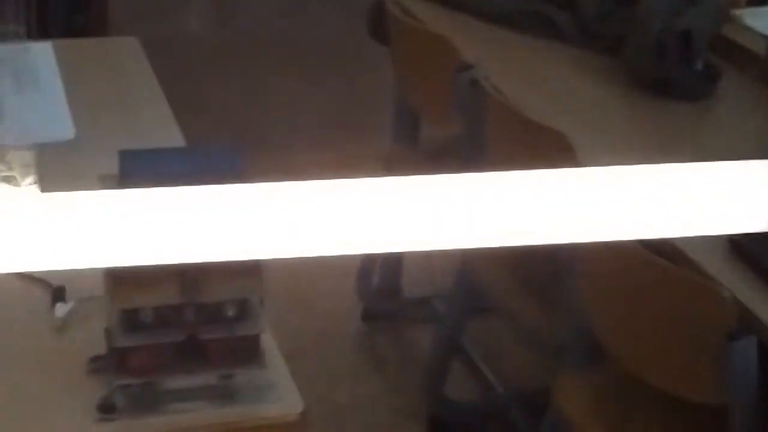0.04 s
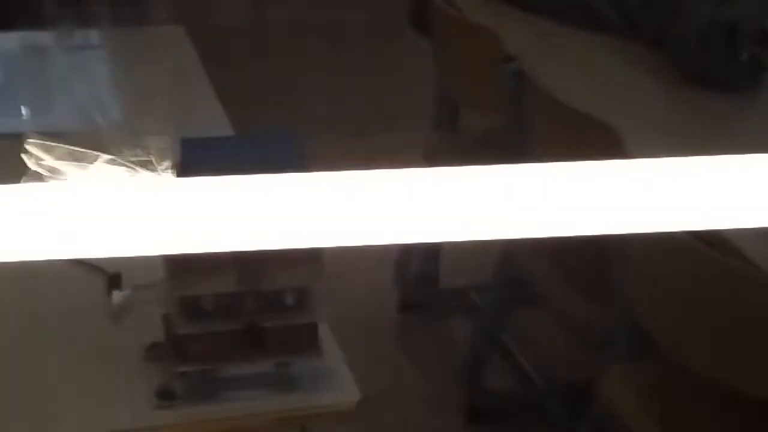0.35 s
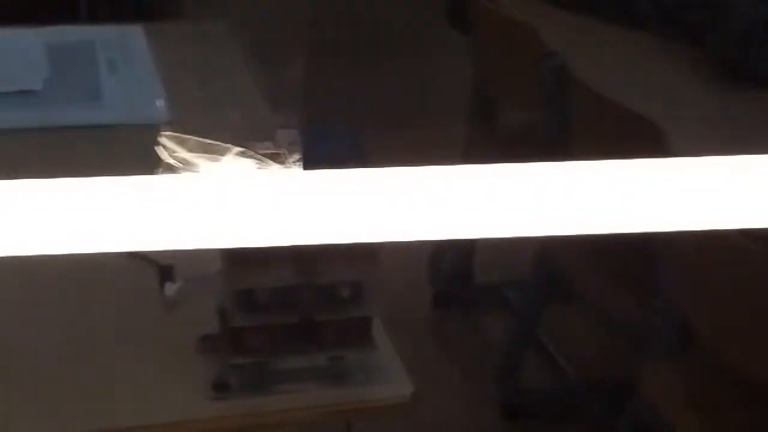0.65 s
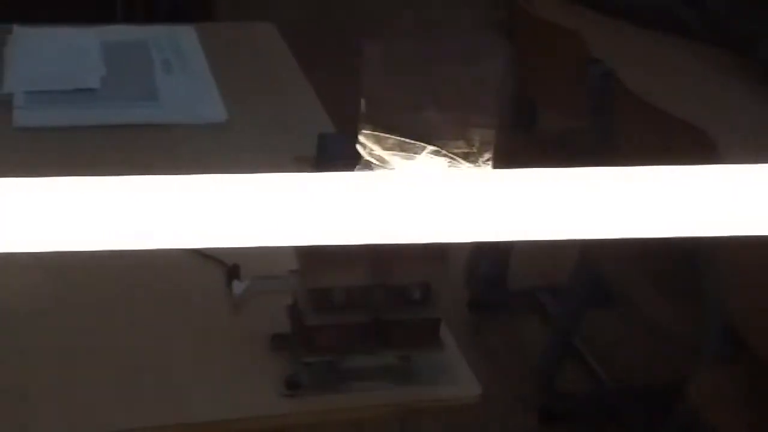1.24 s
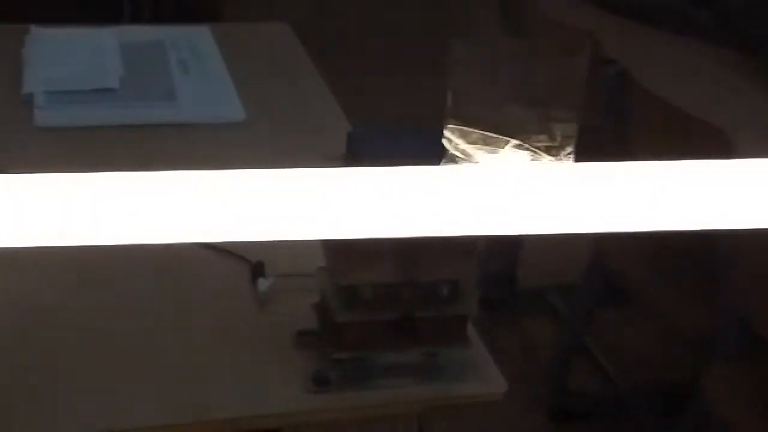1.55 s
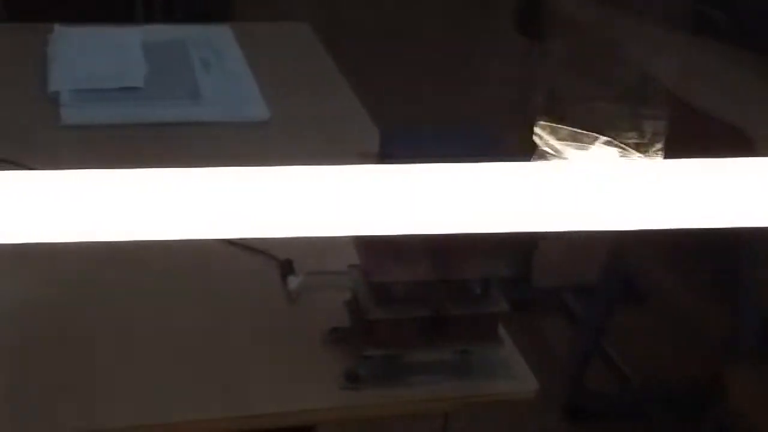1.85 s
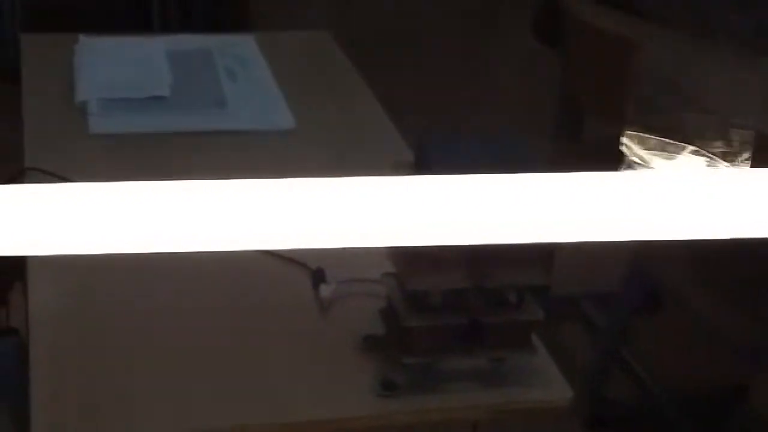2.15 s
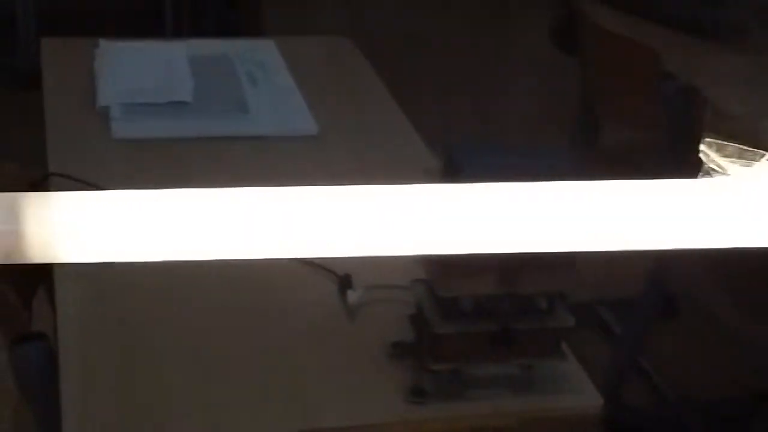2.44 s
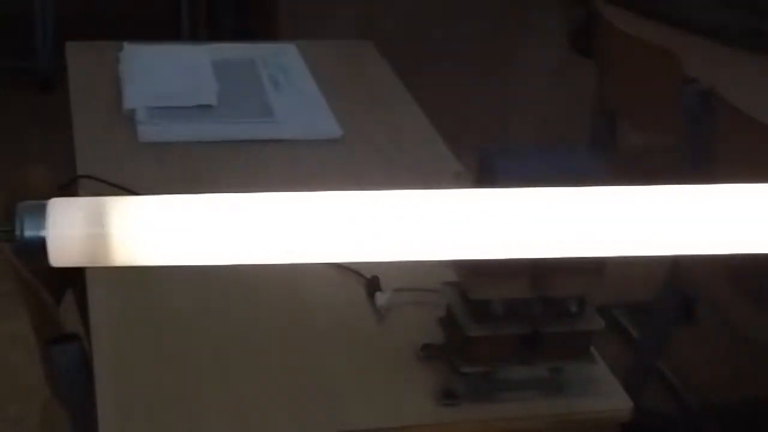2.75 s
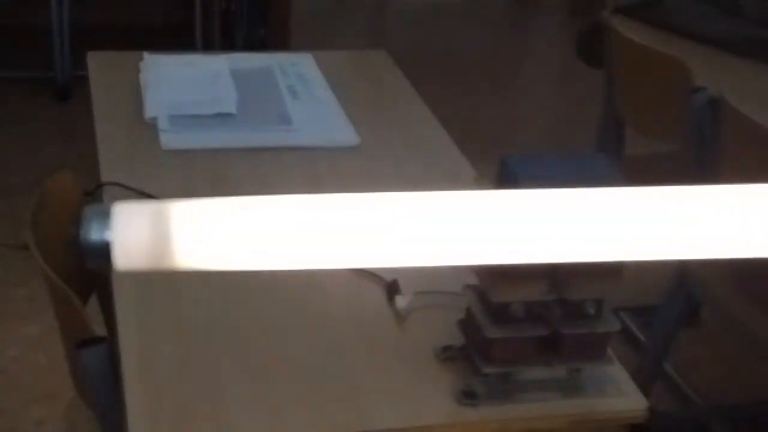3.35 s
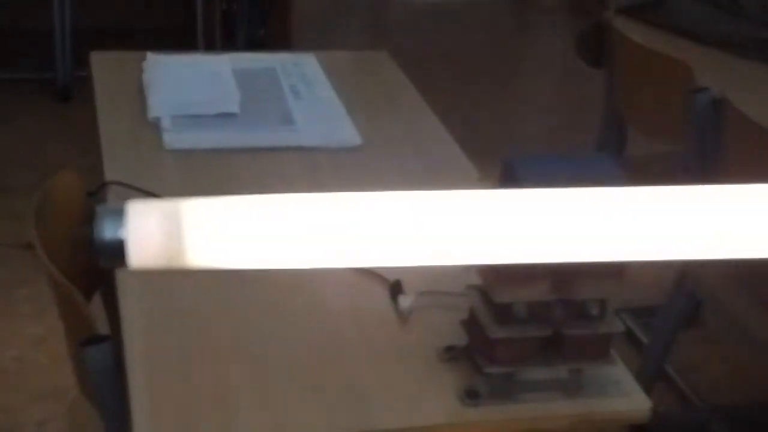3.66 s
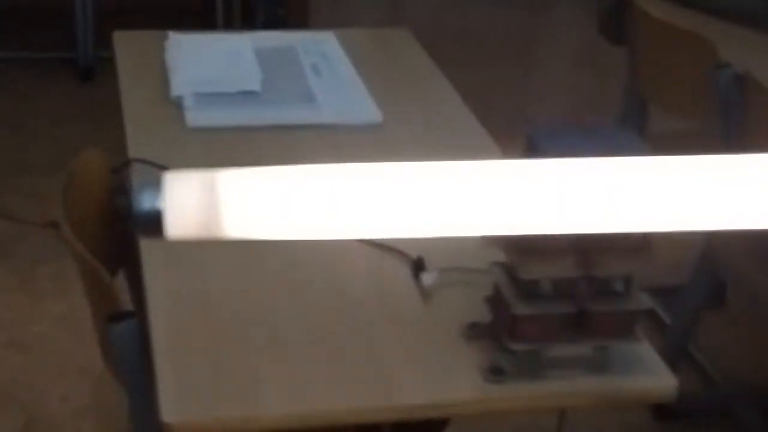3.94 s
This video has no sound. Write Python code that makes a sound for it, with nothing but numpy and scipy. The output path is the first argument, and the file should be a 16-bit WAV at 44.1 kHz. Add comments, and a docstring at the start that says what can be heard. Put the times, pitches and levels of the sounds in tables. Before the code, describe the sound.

A transformer lighting a glass tube buzzes and hums faintly throughout, close by, with a fine rattle, a sizzle on the left and a thin, very high whistle on the right. Quiet room rumble and hiss lie underneath, with tiny microphone ticks around 1, 2 and 3 seconds. At about 3.9 seconds a finger bumps and briefly rubs the microphone, followed by a sharp click on the right.

```python
"""A buzzing hum, close by in a quiet room: a high-voltage transformer on 50 Hz mains lights a glass tube.
Its core hums, and every cycle its plates rattle, knock and sizzle; a thin whistle sits far above.
The hand-held microphone drifts along the tube over room rumble and its own hiss, and ticks faintly.
At the end a finger bumps and rubs its casing, and a sharp click rings it, all on the right side."""
import sys
import numpy as np
from scipy import signal
from scipy.fft import rfft, irfft
from scipy.io import wavfile
from scipy.ndimage import uniform_filter1d, map_coordinates

SR = 44100
rng = np.random.default_rng(int(sys.argv[2]) if len(sys.argv) > 2 else 0)


def dump_mix(stems):
    """Bounce the given channels to the path in sys.argv[1] as a 16-bit WAV at rate SR."""
    frames = np.atleast_2d(stems).T  # one column per channel
    limited = np.clip(frames, -1, 1)  # hard clip at full scale
    pcm = np.round(limited * 32767).astype(np.int16)
    wavfile.write(sys.argv[1], SR, pcm)


N = 176400

# The core's hum. Each row: multiple of the mains, starting level in dB, drift in dB per second.
HUM_LINES = [(1, -74.5, 1), (2, -72, 0.5), (3, -84, -1), (4, -75.5, -0.5), (5, -68, -0.44),
             (6, -79.5, -0.5), (7, -70, -2), (14, -73, -0.5), (16, -70, -.7), (18, -80, -0.5)]
# The plates' bursts. Each row: start in ms into the mains cycle, relative level in dB, decay in ms.
RATTLE_BURSTS = [(5.6, -26, 2.5), (12.8, 8, 1.3)]
KNOCK_BURSTS = [(1.7, 1, 1.24), (5.8, -10, 0.97), (12.5, -10.5, 1.2)]
SIZZLE_BURSTS = [(1.5, -2, 0.32), (2.6, 1.5, 0.82), (3.3, -1, 1.06), (12.5, -18, 2.5)]
# How the bursts ring, before their fades. Each row: frequency in Hz, left and right level in dB per Hz.
RATTLE_SPECTRUM = [(450, -118, -118), (650, -106, -105), (760, -99, -94), (890, -99, -99),
                   (1130, -105, -108), (1510, -122, -122)]
KNOCK_SPECTRUM = [(880, -112, -112), (1040, -100, -103), (1240, -95.5, -102), (1430, -99, -101),
                  (1600, -89, -87.5), (1857, -91, -92), (2020, -96, -97), (2220, -96, -99),
                  (2480, -108, -108), (2800, -109, -110), (3220, -118, -118), (4530, -130, -130)]
NARROW_SIZZLE_SPECTRUM = [(2900, -122, -118), (3420, -107, -106), (3870, -120, -117), (4800, -101.5, -106),
                          (5130, -106, -109), (5650, -95.5, -110), (6030, -94.5, -118), (6230, -86, -116),
                          (6550, -85, -114), (7000, -92.5, -112), (7480, -94, -111), (7900, -104, -114),
                          (8550, -102, -102), (9000, -112, -115), (15300, -114, -108)]
WIDE_SIZZLE_SPECTRUM = [(2930, -120, -116), (3450, -109, -107), (4170, -114, -113), (4900, -99.5, -107),
                        (5200, -103, -109), (5750, -95, -112), (6000, -90.5, -116), (6200, -92, -116),
                        (6500, -87.5, -115), (6960, -92, -114), (7500, -90, -113), (7700, -102, -116),
                        (8500, -106, -107), (9000, -116, -117), (15300, -114, -108)]
# Rattle and knock as the microphone moves. Each row: time in seconds, gain in dB.
PLATE_FADE = [(0, -2.5), (1.3, 0.5), (2.2, 0.3), (3, 0), (4, -1)]
# Room rumble and microphone hiss. Each row: frequency in Hz, left and right level in dB per Hz.
RUMBLE_SPECTRUM = [(20, -118, -118), (32.8, -106, -106), (48, -83, -88), (62.5, -90.5, -90.5),
                   (82, -82.5, -83), (120, -85, -85.5), (176, -91, -91), (247, -87, -87.5), (369, -89, -86),
                   (493, -98.5, -98), (990, -102, -101), (2540, -116, -116), (5000, -135, -135)]
HISS_SPECTRUM = [(25.1, -118, -118), (59, -90, -87.5), (500, -102, -102), (1260, -103, -100),
                 (2190, -102, -100), (2900, -105, -103), (3950, -106, -103.5), (6500, -104, -106),
                 (8300, -107, -104), (9600, -109, -107), (11700, -110, -103), (12300, -110, -106),
                 (15200, -108, -101)]
# Ticks and finger bumps right at the microphone. Each row: start in seconds, level in dB.
MIC_TICKS = [(.345, -64), (.962, -55), (1.072, -56.5), (1.97, -54), (2.957, -56), (3.968, -54.5)]
FINGER_BUMPS = [(3.8704, -27.5), (3.8729, -29)]
# The tone of each handling noise. Each row: frequency in Hz, relative level in dB.
TICK_SPECTRUM = [(4000, -6), (9500, -7), (11300, 7), (12500, -1), (15000, 1)]
BUMP_SPECTRUM = [(25, -34), (60, -5), (115, 3), (300, -1), (650, -3), (1050, -20), (3000, -36), (9000, -43)]
RUB_SPECTRUM = [(200, -2), (1000, -2), (3000, -0.5), (4300, 1), (7000, -0.5), (9500, 0), (12000, -6),
                (15000, -5.5)]
CRACK_SPECTRUM = [(60, -22), (250, -1), (600, 5), (1400, -1.5), (2500, 4.5), (7000, -3.5), (10500, -3),
                  (12300, -22), (14500, -20)]
# The casing's modes. Each row: frequency in Hz, level in dB, time to fall 60 dB in seconds.
CASING_MODES = [(553, -18, .013), (739, -20, 0.016), (945, -17, 0.013), (2060, -5.5, 0.0047),
                (2540, -12.5, 0.0069), (3126, -10.5, 0.0073), (4430, -8.5, 0.0046), (6920, -4.5, 0.0058),
                (9000, -10, 0.0035), (10500, -14.5, 0.0036), (14400, -7, .003)]

MAINS_HZ = 49.967


def undb(db):
    """Decibels to gain."""
    return 10 ** (np.asarray(db) / 20)


def pan(x, db):
    """Place a sound left (+) or right (-) of the microphone; the nearer side keeps its level."""
    return x * undb(np.minimum([[db], [-db]], 0))


def colour(x, spectrum, column=1, size=8192):
    """Causal filter through (Hz, dB) points."""
    points = np.array(spectrum, float)
    hz = np.maximum(np.arange(size + 1) * SR / (2 * size), 1)
    gain = undb(np.interp(np.log(hz), np.log(points[:, 0]), points[:, column]))
    cepstrum = irfft(np.log(gain))
    cepstrum[1:size] *= 2  # fold to minimum phase
    cepstrum[size + 1:] = 0
    response = irfft(np.exp(rfft(cepstrum)))[:size]
    return signal.oaconvolve(x, response)[:N]


def colour_pair(pair, spectrum):
    """Give two white signals the left and right spectra, in dB per Hz."""
    sides = [colour(x / x.std(), spectrum, column=side + 1) for side, x in enumerate(pair)]
    return np.array(sides) * np.sqrt(SR / 2)


def noise(spectrum):
    """Coloured noise, rms 1."""
    grain = colour(rng.standard_normal(N), spectrum)
    return grain / grain.std()


def wander(rate_hz):
    """Slow random drift, spread 1."""
    hold = int(SR / rate_hz)
    steps = np.repeat(rng.standard_normal(N // hold + 1), hold)
    drift = uniform_filter1d(uniform_filter1d(steps, hold), hold)[:N]
    return (drift - drift.mean()) / drift.std()


def core_hum(t, waver_db=2):
    """The core hums at multiples of the mains; each line wavers and drifts as the microphone moves."""
    hum = 0
    for multiple, db, db_per_s in HUM_LINES:
        amplitude = np.sqrt(2) * undb(db + db_per_s * t + waver_db * wander(1.85))
        hum += amplitude * np.sin(2 * np.pi * (multiple * MAINS_HZ * t + rng.random()))
    return pan(hum, db=-2)


def reflections(t, pattern_s=0.91):
    """Grain that repeats every mains cycle; the moving microphone meets a new pattern every pattern_s."""
    period = int(SR / MAINS_HZ)
    patterns = rng.standard_normal(period * (int(t[-1] / pattern_s) + 2))
    place, blend = np.divmod(t / pattern_s, 1)
    position = place + t * MAINS_HZ % 1
    here, ahead = (map_coordinates(patterns, [(position + k) * period], order=3) for k in (0, 1))
    return here * np.cos(blend * np.pi / 2) + ahead * np.sin(blend * np.pi / 2)


def buzz(t, bursts, spectrum, snap, rough, room_db, room_rough, attack_ms=0.15):
    """Bursts locked to the mains: a clean snap, then grain much alike each cycle; the room fills gaps."""
    cycle_ms, samples_per_ms = 1000 / MAINS_HZ, SR / 1000
    power, snaps = undb(room_db) ** 2, 0
    for start_ms, db, decay_ms in bursts:
        age_ms = (t * MAINS_HZ - start_ms / cycle_ms) % 1 * cycle_ms
        envelope = undb(db) * np.minimum(age_ms / attack_ms, 1) * np.exp(-age_ms / decay_ms)
        power += envelope ** 2
        impulse = np.sinc(np.minimum(age_ms, cycle_ms - age_ms) * samples_per_ms)
        snaps += undb(db) * np.sqrt(decay_ms * samples_per_ms / 2) * impulse
    loose = np.sqrt(rough ** 2 * power + (room_rough * undb(room_db)) ** 2)  # never repeats
    pair = [snap * snaps + np.sqrt(power) * reflections(t) + loose * rng.standard_normal(N)
            for _ in range(2)]
    return colour_pair(pair, spectrum)


def plate_clatter(t):
    """The plates rattle low and knock higher, swelling and easing as the microphone passes."""
    rattle = buzz(t, RATTLE_BURSTS, RATTLE_SPECTRUM, snap=0.71, rough=0.35, room_db=-9.5, room_rough=0.33)
    knock = buzz(t, KNOCK_BURSTS, KNOCK_SPECTRUM, snap=1.12, rough=0.25, room_db=-16, room_rough=0.25)
    return (rattle + knock) * undb(np.interp(t, *np.array(PLATE_FADE).T))


def plate_sizzle(t, widen_at_s=0.86, widen_for_s=0.77):
    """The plates sizzle on the left; the band widens as the microphone moves along the tube."""
    narrow = buzz(t, SIZZLE_BURSTS, NARROW_SIZZLE_SPECTRUM,
                  snap=0.39, rough=0.3, room_db=-16.5, room_rough=0.66)
    wide = buzz(t, SIZZLE_BURSTS, WIDE_SIZZLE_SPECTRUM,
                snap=0.26, rough=0.26, room_db=-16, room_rough=0.65)
    wide_share = np.clip((t - widen_at_s) / widen_for_s, 0, 1)
    return np.sqrt(1 - wide_share) * narrow + np.sqrt(wide_share) * wide


def whistle(t, hz=14309, left_db=-76.5, right_db=-65, waver_db=0):
    """A thin electronic tone off to the right, steady unless given a waver."""
    level_db = np.array([[left_db], [right_db]]) + waver_db * wander(8)
    return np.sqrt(2) * undb(level_db) * np.sin(2 * np.pi * hz * t)


def room_tone(swell_db=1):
    """The room's rumble reaches both sides alike; each side of the microphone adds its own hiss."""
    rumble = rng.standard_normal(N) * undb(swell_db * wander(2.6))
    hiss = rng.standard_normal((2, N))
    return colour_pair([rumble, rumble], RUMBLE_SPECTRUM) + colour_pair(hiss, HISS_SPECTRUM)


def microphone_ticks(t, length_s=0.016):
    """Faint high ticks at the microphone, each a rounded puff of noise."""
    ticks = 0
    for start_s, db in MIC_TICKS:
        envelope = np.sin(np.pi * np.clip((t - start_s) / length_s, 0, 1))
        ticks += undb(db) * envelope * noise(TICK_SPECTRUM)
    return pan(ticks, db=-8)


def strike(t, start_s, spectrum):
    """One push through a spectrum, peak 1."""
    push = colour(np.sinc((t - start_s) * SR), spectrum)
    return push / np.abs(push).max()


def finger_bump(t):
    """A finger lands softly on the right of the casing, two pushes heard as one."""
    bump = sum(undb(db) * strike(t, start_s, BUMP_SPECTRUM) for start_s, db in FINGER_BUMPS)
    return pan(bump, db=-17.5)


def finger_rub(t, start_s=3.872, length_s=0.069, fade_s=0.0063, rub_db=-42, catch_s=3.8838, catch_db=-29):
    """The finger rubs along the casing and catches once on the way."""
    contact = np.clip(np.minimum(t - start_s, start_s + length_s - t) / fade_s, 0, 1)
    friction = undb(rub_db) * contact * noise(RUB_SPECTRUM)
    catch = undb(catch_db) * strike(t, catch_s, RUB_SPECTRUM)
    return pan(friction + catch, db=-27)


def mode(age, hz, db, t60_s):
    """One struck resonance, falling 60 dB in t60_s."""
    return undb(db) * np.exp(-np.log(1000) * age / t60_s) * np.sin(2 * np.pi * hz * age)


def casing_click(t, start_s=3.924, attack_s=0.00054):
    """A sharp click rings the casing and rocks the microphone, pushing its two sides opposite ways."""
    crack_db, crack_s, tail_db, tail_s = -16, 0.00081, -32, 0.0055
    age = np.maximum(t - start_s, 0)
    # neighbouring modes swing in opposite directions
    ring = sum((-1) ** k * mode(age, *row) for k, row in enumerate(CASING_MODES))
    decay = undb(crack_db) * np.exp(-age / crack_s) + undb(tail_db) * np.exp(-age / tail_s)
    crack = decay * noise(CRACK_SPECTRUM)
    attack = np.minimum(age / attack_s, 1)
    thump = mode(age, hz=76, db=-33, t60_s=0.085)
    return pan(attack * (ring + crack), db=-18) + np.array([thump, -thump])


def scene():
    """The transformer and the room as they reach the microphone, with the handling right on it."""
    t = np.arange(N) / SR
    steady = core_hum(t) + plate_clatter(t) + plate_sizzle(t) + whistle(t) + room_tone()
    handling = microphone_ticks(t) + finger_bump(t) + finger_rub(t) + casing_click(t)
    return steady + handling


def record(dry):
    """The recorder cuts the top steeply."""
    top_hz = 15750
    return signal.sosfilt(signal.ellip(10, 0.1, 80, top_hz, fs=SR, output="sos"), dry)


dry = scene()
out = record(dry)
dump_mix(out)
```